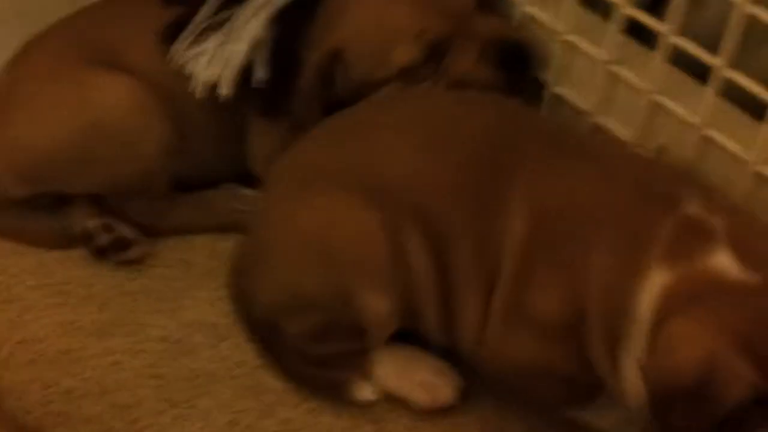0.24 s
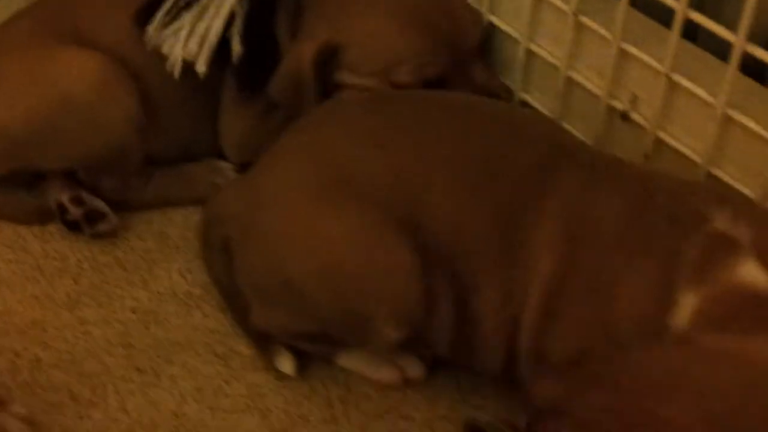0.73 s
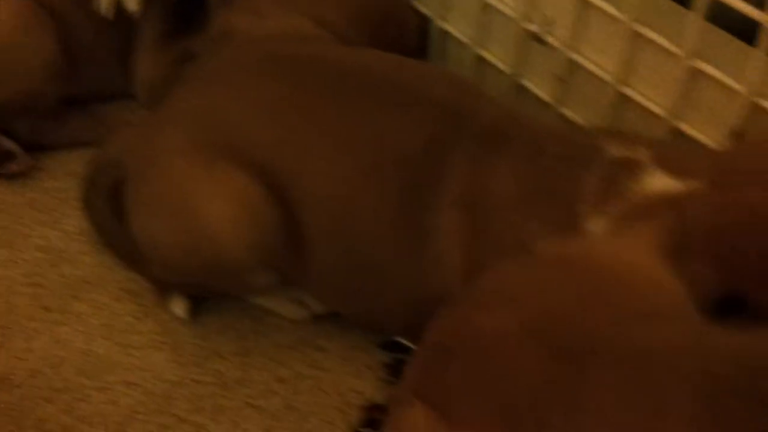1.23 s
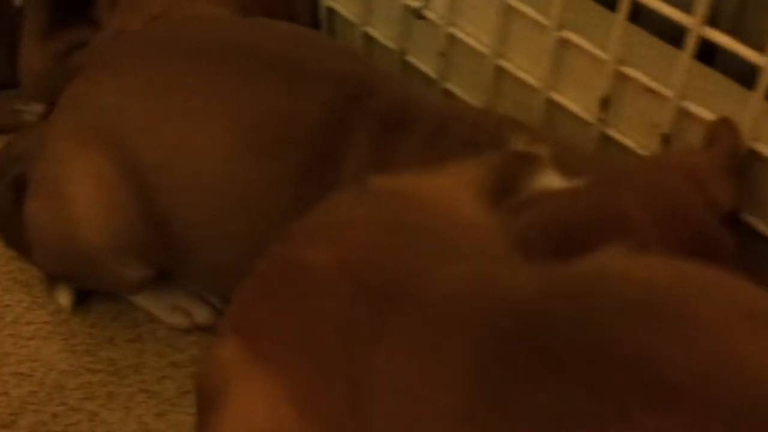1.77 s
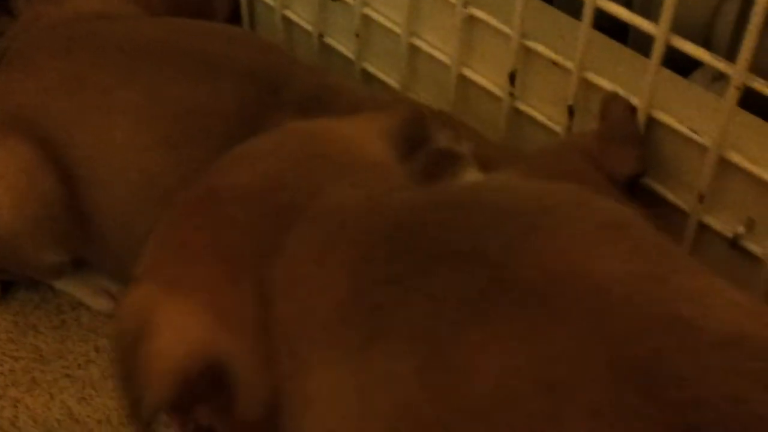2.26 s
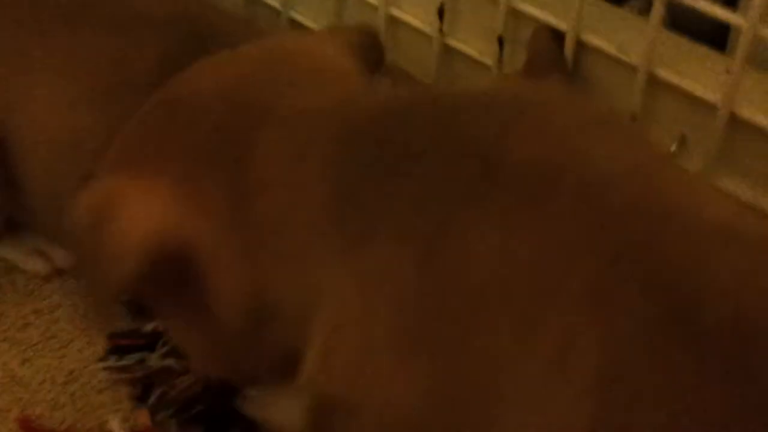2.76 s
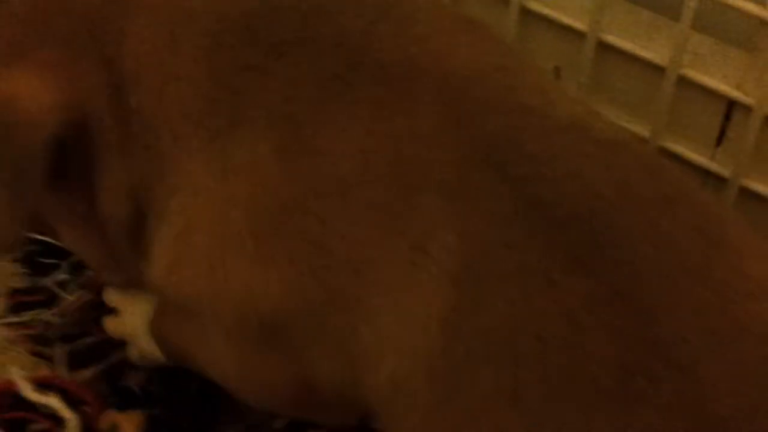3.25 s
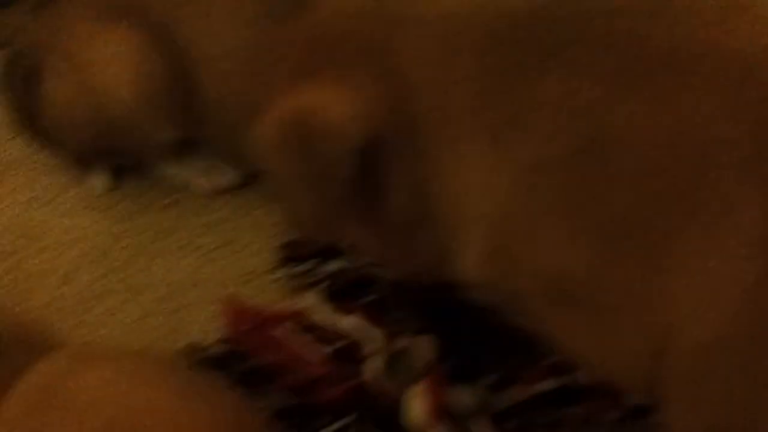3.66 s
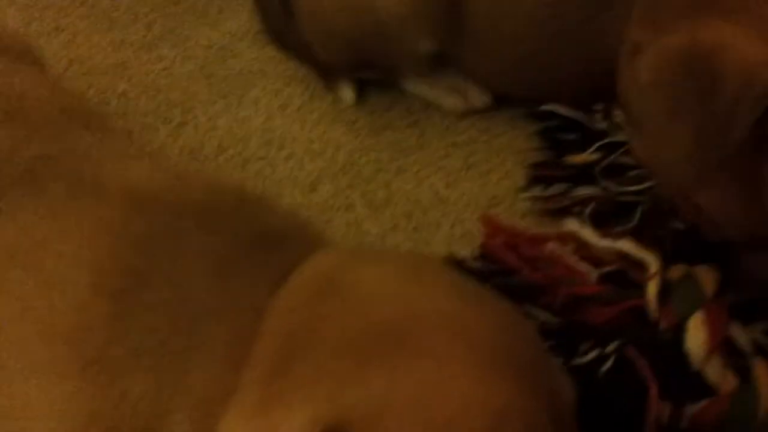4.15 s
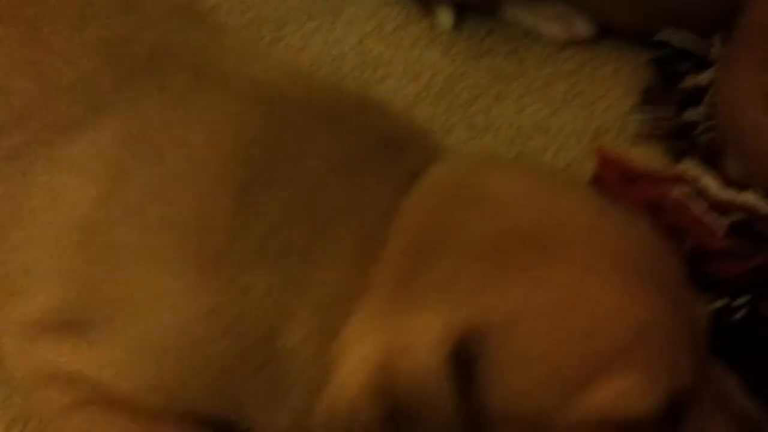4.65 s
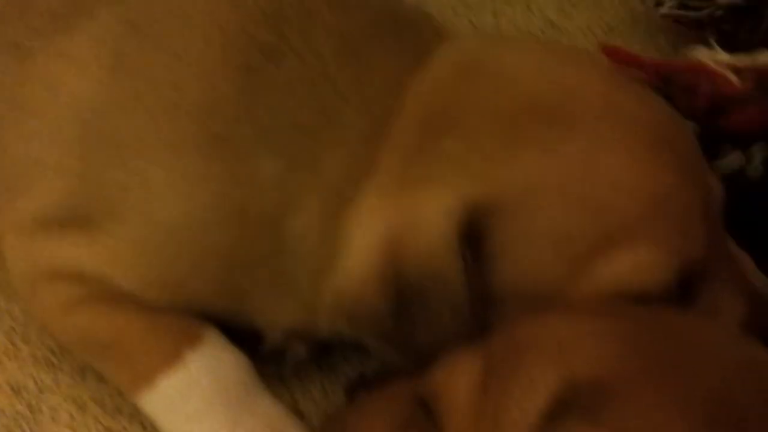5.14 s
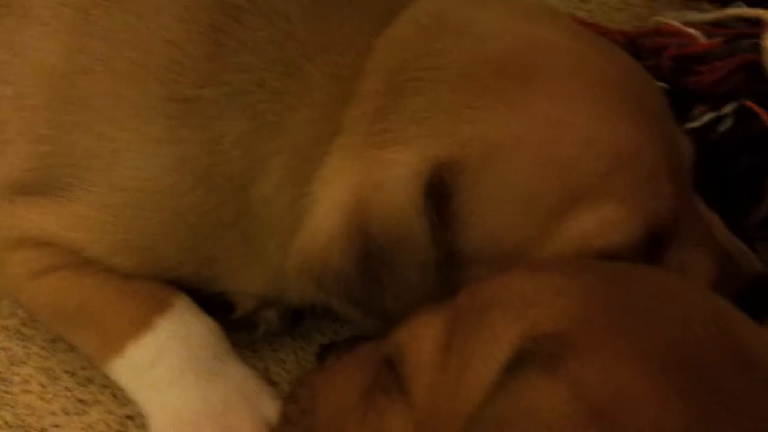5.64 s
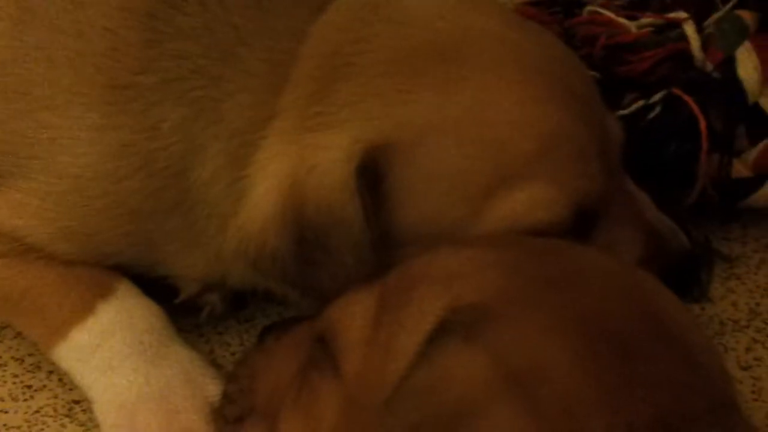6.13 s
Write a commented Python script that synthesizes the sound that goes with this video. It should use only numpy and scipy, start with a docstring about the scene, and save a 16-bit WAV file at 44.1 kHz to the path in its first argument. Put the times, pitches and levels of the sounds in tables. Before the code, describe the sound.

A puppy mouths a rope toy with small wet smacks and dry ticks over carpet rustle, whimpers thinly, then a loud hollow knock lands.

```python
"""One puppy mouths a rope toy, close to the microphone: wet smacks are sudden pushes ringing bands of sound.
Dry ticks of fibre, soft taps and scuffs join them, over the rustle of puppies shifting on carpet, made of noise.
A thin whimper and short squeaks are bending tones; near the end a loud, hollow knock rings a set of decaying notes.
All of it sits in a small room with echoes, soft floor booms, steady hiss and a faint hum."""
import sys
import numpy as np
from scipy import signal
from scipy.fft import rfft, irfft
from scipy.io import wavfile
from scipy.ndimage import uniform_filter1d

SR = 44100
rng = np.random.default_rng(int(sys.argv[2]) if len(sys.argv) > 2 else 0)


def transcribe(signal):
    """Save signal, clipped to [-1, 1], as a 16-bit WAV file at the path in sys.argv[1]."""
    frames = np.atleast_2d(signal).T
    limited = np.clip(frames, -1, 1)
    pcm = np.round(limited * 32767).astype(np.int16)
    wavfile.write(sys.argv[1], SR, pcm)


N = 281431

# The quiet room and microphone hiss. Each row: frequency in Hz, relative level in dB per Hz.
AIR_SPECTRUM = [(12, -27), (20, -6), (48, -3.5), (114, 0.5), (307, -9), (510, -11.5), (783, -11),
                (2000, -16.5), (4460, -20.5), (7820, -20.5), (11100, -23), (12000, -24.5)]
AIR_DB = -57  # overall level of that noise
# How long the room's echo lasts. Each row: frequency in Hz, time to fall by 60 dB in seconds.
ROOM_DECAY = [(150, 0.51), (600, 0.49), (2000, 0.18), (8000, 0.23)]
# Soft booms of the floor. Each row: pitch in Hz, level in dB.
FLOOR_BOOMS = [(101, -72), (167, -67), (305, -69.5)]
# Shifts of a body on the carpet. Each row: time of fastest movement in seconds, length in seconds,
# strength in dB before the rustle's own settings.
BODY_SHIFTS = [(.01, 0.15, -54.5), (0.423, 0.58, -54.5), (0.74, 0.34, -57), (1.038, 0.54, -55.5),
               (1.552, 0.36, -56), (1.844, 1, -57), (2.146, 0.17, -52.5), (2.383, 0.2, -50.5),
               (2.52, 0.58, -54.5), (3.128, 1, -56), (3.62, 0.77, -59), (3.839, 0.16, -54),
               (4.155, 0.17, -54), (4.374, 0.6, -61.5), (5, 0.44, -58.5)]
# A shift gathers speed over this share of its length and slows over the rest; the bodies never lie quite still.
SHIFT_RISE, STIR_DB = 0.5, -67.5
# Tone of fine fur hiss. Each row: frequency in Hz, relative level in dB per Hz.
FUR_SPECTRUM = [(500, -10.5), (1500, -14.5), (4500, -7), (6000, -4), (7600, -3), (9000, -5.5),
                (12000, -9.5)]
# Tone of the lower rub on carpet. Each row: frequency in Hz, relative level in dB per Hz.
RUB_SPECTRUM = [(100, 10), (300, 2), (900, -1.5), (2200, 3.5), (4000, -7.5), (8000, -23)]
# Scuffs of claws, fur and rope. Each row: start in seconds, length in seconds, level in dB,
# centre of the scrape in Hz.
SCUFF_EVENTS = [(1.02, 0.023, -44.5, 2100), (1.025, 0.024, -45.5, 870), (1.044, 0.0087, -46, 2880),
                (1.379, 0.15, -64.5, 1560), (1.739, 0.036, -46, 10000), (1.849, 0.028, -46, 3660),
                (2.122, 0.057, -61, 806), (2.331, 0.019, -47.5, 5070), (2.347, 0.009, -46.5, 8800),
                (2.518, 0.0082, -49, 7500), (2.557, 0.0086, -49, 7400), (3.803, 0.034, -50, 5100),
                (4.125, 0.031, -59, 1190), (4.306, 0.024, -53, 4140), (5.015, .1, -63, 2180),
                (5.418, 0.032, -52, 7300), (5.509, 0.094, -63, 800), (5.7, 0.17, -61, 825),
                (5.828, 0.06, -56, 7650)]
# Dull taps and bumps, some the low thud under a smack. Each row: start in seconds, level in dB, pitch in Hz.
TAP_EVENTS = [(0.5567, -37.5, 167), (0.5612, -46, 250), (0.671, -55.5, 318), (1.4925, -50, 800),
              (2.552, -43.5, 940), (2.6315, -45, 1130), (2.645, -48.5, 373), (2.859, -48, 172),
              (3.1297, -46, 1600), (3.195, -47.5, 830), (3.207, -48.5, 1390), (3.2488, -46.5, 1056),
              (3.2758, -44, 1030), (3.819, -47.5, 296), (3.921, -49, 856.3), (4.119, -49, 940),
              (4.2298, -50, 1090), (4.829, -49, 157), (5.399, -48, 428)]
# Thin squeaks whose pitch dips and comes back. Each row: start in seconds, length in seconds,
# lowest pitch in Hz, depth of the dip in Hz, level at the lowest pitch in dB.
SQUEAK_EVENTS = [(0.46, 0.036, 712, 204, -50), (1.818, .054, 11200, 800, -59)]
# Pitch curves of a short whimper and of a longer one. Each row of a curve: time in seconds, pitch in Hz.
WHIMPER_CURVES = [
    [(1.876, 1330), (1.885, 1430), (1.897, 1170), (1.908, 1010)],
    [(1.931, 1330), (1.940, 1460), (1.960, 1300), (1.972, 1270), (1.980, 1080), (1.992, 1375),
     (2.005, 1290), (2.039, 1295), (2.048, 1385), (2.058, 1290), (2.081, 1345), (2.102, 1270),
     (2.114, 1150), (2.132, 1330)],
]
# A whimper gets weaker as its pitch falls and as it goes on.
WEAKEN_DB_PER_HZ, TIRE_DB_PER_S = -0.0173, -24
# The knock lands and rebounds, softer each time; the last row is a faint echo of it from a wall. Each row: time
# in seconds, peak level in dB before # filtering, pitch of the contact in Hz.
KNOCK_CONTACTS = [(5.8817, -11, 420), (5.8896, -12, 265), (5.8946, -15, 205), (5.9075, -26, 230),
                  (5.9275, -31, 380)]
# Faint rattles at and just after the knock's first contact. Each row: start in seconds, level in dB, pitch in Hz.
RATTLE_EVENTS = [(5.882, -45, 1480), (5.903, -46.5, 1270)]
# Notes of the knocked panel. Each row: pitch in Hz, starting level in dB before the knock's own settings,
# time to fall by 60 dB in seconds.
PANEL_NOTES = [(101.5, -36, 0.36), (177, -31.5, 0.33), (240, -23, 0.16), (291.5, -30.5, 0.27),
               (402, -29, 0.052), (448, -25, 0.22), (494, -40, 0.26), (548, -25.5, 0.11), (670, -39, 0.18),
               (750, -38.5, 0.21), (841, -32.5, 0.1)]
# Ticks of fibre. Each row: start in seconds, level in dB, pitch in Hz.
TICK_EVENTS = [(.369, -48, 8800), (0.467, -44, 6650), (.68, -53, 7600), (.712, -50.5, 7350),
               (.804, -50.5, 7460), (1.747, -47.5, 9800), (2.643, -50, 6800), (2.9834, -41.5, 6830),
               (3.0748, -44, 6350), (3.12, -47, 6550), (3.1745, -46, 7308), (3.556, -54, 5500),
               (3.587, -43, 7300), (3.998, -54.5, 7500), (4.121, -49, 6760), (4.1447, -46.5, 8400),
               (4.206, -41.5, 7100), (4.373, -49.5, 7500), (4.855, -49, 4900), (5.0227, -45.5, 9000),
               (5.051, -50, 8240), (5.098, -50, 6460), (5.4584, -36.5, 7200), (5.463, -38.5, 7000)]
# Smacks of the mouth. Each row: start in seconds, cavity level in dB, cavity pitch in Hz,
# snap level in dB, snap pitch in Hz.
SMACK_EVENTS = [(0.2291, -42, 2330, -65, 7500), (0.2682, -49.5, 3030, -66, 7500),
                (.28, -55, 2700, -59, 8150), (.421, -44, 2640, -35, 7100), (0.5115, -46, 3600, -42.5, 7100),
                (0.518, -43, 2660, -40.5, 7350), (1.6115, -49.5, 3640, -53, 6730),
                (1.682, -43.5, 2570, -48, 5460), (1.7812, -45.5, 2620, -47.5, 6900),
                (1.8828, -47, 3500, -53, 6900), (2.0136, -52.5, 3180, -53, 6640),
                (2.236, -54, 4470, -47, 6670), (2.4516, -48, 3900, -49, 7600),
                (2.509, -45.5, 3600, -48, 7300), (2.513, -50, 3330, -39.5, 7400),
                (2.546, -46, 3600, -56, 6700), (2.5842, -45, 2740, -59, 7600),
                (2.624, -48.5, 2700, -57, 6100), (2.6648, -53, 3700, -47.5, 7050),
                (3.0234, -53.5, 2980, -43.5, 7100), (3.1296, -37, 2420, -33.5, 6480),
                (3.218, -50, 2010, -45, 7100), (3.6991, -46, 4220, -45.5, 6150),
                (3.7414, -49.5, 2700, -59, 7300), (3.75, -46, 3250, -43.5, 7070),
                (3.8084, -51, 3870, -39.5, 6100), (3.8504, -54.5, 3600, -48.5, 7150),
                (3.9215, -49, 2050, -52.5, 6240), (4.23, -47, 3100, -41.5, 5760),
                (4.4, -49, 3600, -48.5, 7950), (4.4383, -49.5, 4400, -42, 6540),
                (4.9952, -42, 2830, -45, 8150), (5.0896, -51.5, 3130, -48.5, 6950)]
EDGE_HZ = 11850  # the recorder passes little above this


def amp(db):
    """Turns decibels into a plain multiplier."""
    return 10 ** (np.asarray(db) / 20)


def evened(x):
    """Scales x to an average strength (rms) of 1."""
    return x / np.sqrt(np.mean(x ** 2) + 1e-20)


def read(points, hz):
    """Joins (Hz, value) points by straight lines on a log-frequency axis."""
    f, value = np.transpose(points)
    return np.interp(np.log(hz + 1), np.log(f + 1), value)


def add(mix, s, sound):
    """Adds a sound into the mix at s seconds, cutting off what runs past the end."""
    part = mix[round(s * SR):][:len(sound)]
    part += sound[:len(part)]


def coloured(x, spectrum):
    """Filters x with a table of levels by frequency, at rms 1."""
    gain = amp(read(spectrum, np.fft.rfftfreq(len(x), 1 / SR)))
    return evened(irfft(rfft(x) * gain, len(x)))


def grains(size, per_s, spread_db):
    """Scatters tiny impulses at random; a larger spread makes their strengths more uneven."""
    strength = amp(spread_db * np.minimum(rng.exponential(1, size), 4))
    present = rng.random(size) < per_s / SR
    return evened(rng.standard_normal(size) * strength * present)


def levelled(ring):
    """Scales a short ring so that its energy equals rms 1 over 4 ms."""
    return ring / np.sqrt(np.sum(ring ** 2) / (.004 * SR))


def pop(push, hz, q):
    """A push rings a damped resonance, filtered twice for steep skirts."""
    b, a = signal.iirpeak(hz, q, fs=SR)
    once = signal.lfilter(b, a, push)
    return levelled(signal.lfilter(b, a, once))


def burst(push, hz, octaves):
    """A push rings a band with steep edges, this many octaves wide."""
    edges = hz * 2 ** (np.array([-.5, .5]) * octaves)
    band = signal.butter(3, edges, "band", fs=SR, output="sos")
    return levelled(signal.sosfilt(band, push))


def crack(crackle_s=0.00097):
    """One sudden push followed by a brief crackle that dies away."""
    t = np.arange(1024) / SR
    crackle = rng.standard_normal(len(t)) * np.exp(-t / crackle_s)
    return (t == 0) + .2 * crackle


def whistle(hz, jitter=0.0045, fade_s=0.0021):
    """A thin, pure tone with a slightly unsteady pitch and soft ends."""
    waver = 1 + jitter * evened(uniform_filter1d(rng.standard_normal(len(hz)), size=100))
    phase = 2 * np.pi * np.cumsum(hz * waver) / SR
    fades = signal.windows.tukey(len(hz), 2 * fade_s * SR / len(hz))
    return evened(np.sin(phase)) * fades


def room(x, near_db, near_s, tail_db):
    """Echoes only: quick scatter from bodies and pen, and the short tail of a carpeted room."""
    t = np.arange(SR // 2) / SR
    reflections = rng.standard_normal(len(t)) * (rng.random(len(t)) < .2)
    near = reflections * np.exp(-t / near_s) * (t > .001)
    # the tail is noise split into frequencies, each fading at its own rate
    hz, at, z = signal.stft(rng.standard_normal(len(t)) * (t > .012), SR, nperseg=256)
    fading = z * amp(-60 * at / read(ROOM_DECAY, hz)[:, None])
    tail = signal.istft(fading, SR, nperseg=256)[1][:len(t)]
    echo = amp(near_db) * near / np.linalg.norm(near) + amp(tail_db) * tail / np.linalg.norm(tail)
    return signal.fftconvolve(x, echo)[:N]


def wandering(x, turn_s=0.372):
    """As puppies move, sound takes changing paths: three echoes swell in steady turn, powers adding to 1."""
    angle = np.pi * np.arange(N) / SR / turn_s
    paths = [x * np.cos(angle + np.pi * k / 3) * np.sqrt(2 / 3) for k in range(3)]
    # only the balance of scatter and tail counts here: the sum is set as strong as x itself
    echoes = sum(room(path, near_db=-8.0, near_s=0.0069, tail_db=-12.5) for path in paths)
    return evened(echoes) * np.std(x)


def air(hum_hz=49, hum_db=-67):
    """Steady room noise with a faint low hum."""
    hum = amp(hum_db) * evened(np.sin(2 * np.pi * hum_hz * np.arange(N) / SR))
    return amp(AIR_DB) * coloured(rng.standard_normal(N), AIR_SPECTRUM) + hum


def booms(q=4.15):
    """Soft, irregular nudges of weight make the floor swell in low lumps."""
    out = np.zeros(N)
    for hz, db in FLOOR_BOOMS:
        nudges = grains(N, per_s=22, spread_db=0.0)
        out += amp(db) * evened(pop(nudges, hz, q))
    return out


def motion():
    """How briskly fur rubs on the pile, as a gain: each shift swells and dies away over a slight stir."""
    t, power = np.arange(N) / SR, amp(STIR_DB) ** 2
    for s, length, db in BODY_SHIFTS:
        start, end = s - SHIFT_RISE * length, s + (1 - SHIFT_RISE) * length
        speed = np.interp(t, [start, s, end], [0, 1, 0])
        power = power + amp(db) ** 2 * speed ** 2
    return np.sqrt(power)


def rustle(hiss_db=-4, rub_db=-7.0, snag_db=-12, snag_hz=7300, rub_follow=0.96, catch_db=3.0, catch_s=.025):
    """Fur slides on carpet, catching and letting go: fine hiss, a lower rub and tiny snags."""
    # a random curve with a new point every catch_s seconds makes the movement uneven
    catch = evened(np.interp(np.arange(N) / SR / catch_s, np.arange(2048), rng.standard_normal(2048)))
    brisk = motion() * amp(catch_db * catch)
    mean = np.sqrt(np.mean(brisk ** 2))
    hiss = amp(hiss_db) * coloured(grains(N, per_s=3200, spread_db=4.0), FUR_SPECTRUM)
    snags = amp(snag_db) * evened(burst(grains(N, per_s=83, spread_db=0.0), snag_hz, 0.57))
    rub = amp(rub_db) * coloured(grains(N, per_s=1800, spread_db=3.0), RUB_SPECTRUM)
    # the low rub swells slightly less than the hiss
    rub_gain = mean * evened(brisk ** rub_follow)
    return brisk * (hiss + snags) + rub_gain * rub


def scuffs(hiss_db=-7, q=1.06):
    """Fibres catch and let go in a dense burst, with a hiss of fur around it."""
    out = np.zeros(N)
    for s, length, db, hz in SCUFF_EVENTS:
        size = round(length * SR)
        hiss = coloured(rng.standard_normal(size), FUR_SPECTRUM)
        scrape = evened(pop(grains(size, per_s=3200, spread_db=1.5), hz, q))
        soft_ends = signal.windows.tukey(size, .5)
        add(out, s, amp(db) * evened(scrape + amp(hiss_db) * hiss) * soft_ends)
    return out


def taps(octaves=1.21):
    """Soft contacts ring for only a cycle or two."""
    out = np.zeros(N)
    for s, db, hz in TAP_EVENTS:
        add(out, s, amp(db) * burst(signal.unit_impulse(2048), hz, octaves))
    return out


def squeaks(ends_db=-6):
    """Thin tones that dip in pitch and return, each loudest at the bottom of its dip."""
    out = np.zeros(N)
    for s, length, low_hz, dip_hz, db in SQUEAK_EVENTS:
        bend = np.linspace(-1, 1, round(length * SR)) ** 2  # 1 at both ends, 0 in the middle
        add(out, s, amp(db + ends_db * bend) * whistle(low_hz + dip_hz * bend))
    return out


def whimpers(db=-51.0, top_hz=1400):
    """A thin whine that bends up and down; it weakens as it goes on and wherever its pitch drops."""
    out = np.zeros(N)
    for curve in WHIMPER_CURVES:
        at, pitch = np.transpose(curve)
        t = np.arange(at[0], at[-1], 1 / SR)
        hz = uniform_filter1d(np.interp(t, at, pitch), size=200)
        # db is the level at the start for a pitch of top_hz
        level_db = db + WEAKEN_DB_PER_HZ * (top_hz - hz) + TIRE_DB_PER_S * (t - at[0])
        add(out, at[0], amp(level_db) * whistle(hz))
    return out


def contact(s, db, hz):
    """A padded contact pushes the air out and back once; a lower pitch makes a longer push."""
    u = 2 * np.pi * hz * (np.arange(N) / SR - s)
    return -amp(db) * u * np.exp((1 - u ** 2) / 2)


def knock(ring_db=-2, build_s=0.0023, low_hz=105, high_hz=1000, rattle_s=0.0056, rattle_octaves=0.45):
    """Something padded lands and rebounds on a hollow panel, which rings on and rattles faintly."""
    t = np.arange(SR // 2) / SR
    contacts = sum(contact(*row) for row in KNOCK_CONTACTS)
    # the padding muffles the treble
    out = signal.sosfilt(signal.butter(9, high_hz, fs=SR, output="sos"), contacts)
    ring = sum(amp(db - 60 * t / t60) * np.sin(2 * np.pi * hz * t) for hz, db, t60 in PANEL_NOTES)
    build_up = 1 - np.exp(-t / build_s)
    add(out, KNOCK_CONTACTS[0][0], amp(ring_db) * ring * build_up)
    for s, db, hz in RATTLE_EVENTS:
        add(out, s, amp(db) * burst(crack(rattle_s), hz, rattle_octaves))
    # little deep bass comes through
    return signal.sosfilt(signal.butter(2, low_hz, "high", fs=SR, output="sos"), out)


def ticks(octaves=0.47, dry_db=-11, dry_hz=5800):
    """A fibre lets go: a thin, bright tick with a little of the fur's wider hiss."""
    out = np.zeros(N)
    for s, db, hz in TICK_EVENTS:
        tick = burst(crack(), hz, octaves)
        wide_hiss = amp(dry_db) * burst(crack(), dry_hz, 1.57)
        add(out, s, amp(db) * (tick + wide_hiss))
    return out


def smacks(split=1.247, cavity_octaves=0.52, snap_octaves=0.58, jaw_db=-12, jaw_hz=1150, jaw_octaves=1.0):
    """A wet film snaps; the mouth rings in two resonances around its pitch, and the jaw thuds under it."""
    out = np.zeros(N)
    for s, cavity_db, cavity_hz, snap_db, snap_hz in SMACK_EVENTS:
        push = crack()
        lower = burst(push, cavity_hz / split, cavity_octaves)
        upper = burst(push, cavity_hz * split, cavity_octaves)
        jaw = amp(jaw_db) * burst(push, jaw_hz, jaw_octaves)  # jaw_db is relative to the cavity
        mouth = (lower + upper) / np.sqrt(2) + jaw
        snap = burst(push, snap_hz, snap_octaves)
        add(out, s, amp(cavity_db) * mouth + amp(snap_db) * snap)
    return out


def scene(echo_db=-3):
    """Mouthing and movement close by, whimpers with only a little echo, and the knock, all in one room."""
    background = air() + booms()
    puppies = rustle() + scuffs() + taps() + ticks() + smacks()
    puppies_echo = amp(echo_db) * wandering(puppies)
    whine = squeaks() + whimpers()
    whine_echo = room(whine, near_db=-26, near_s=0.0072, tail_db=-19)
    thud = knock()
    thud_echo = room(thud, near_db=-22, near_s=0.027, tail_db=-23.5)
    mix = background + puppies + puppies_echo + whine + whine_echo + thud + thud_echo
    return mix[None]  # one channel


def record(dry, port_hz=7300, port_q=9, port_db=-8):
    """The microphone port rings a little in the treble; then the recorder's band limit."""
    b, a = signal.iirpeak(port_hz, port_q, fs=SR)
    heard = dry + amp(port_db) * signal.lfilter(b, a, dry)
    band_limit = signal.firwin(601, EDGE_HZ, window=("kaiser", 8), fs=SR)
    return signal.oaconvolve(heard, band_limit[None], "same")


dry = scene()
out = record(dry)
transcribe(out)
```